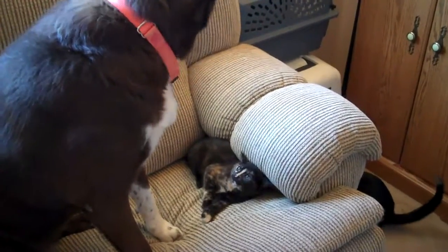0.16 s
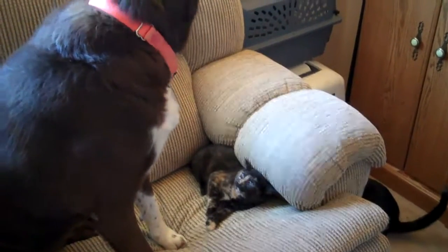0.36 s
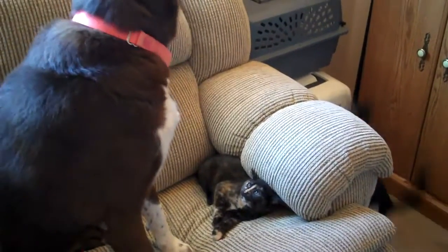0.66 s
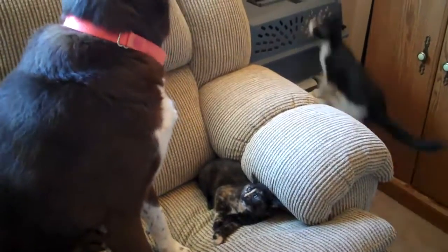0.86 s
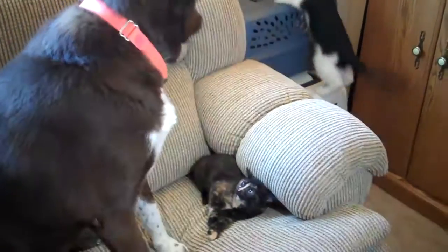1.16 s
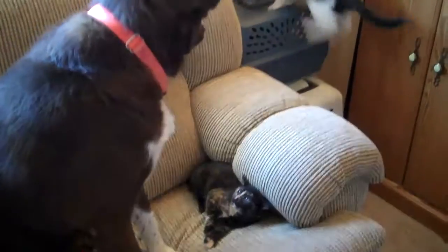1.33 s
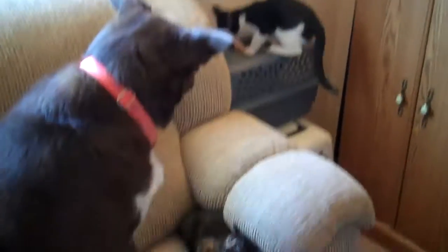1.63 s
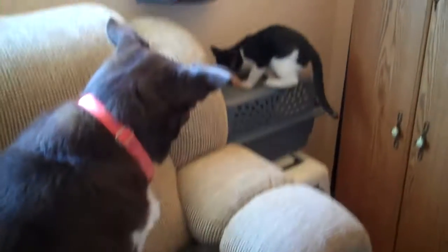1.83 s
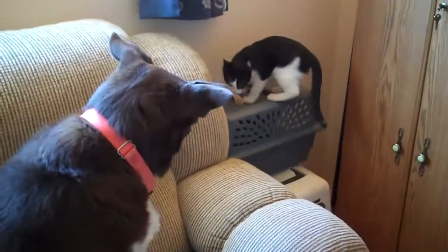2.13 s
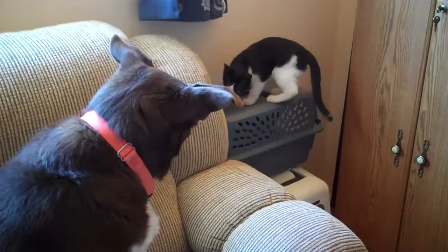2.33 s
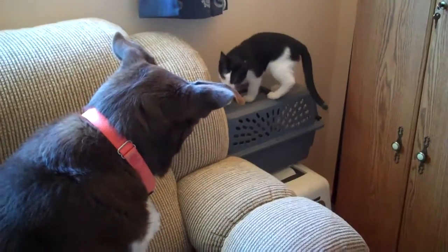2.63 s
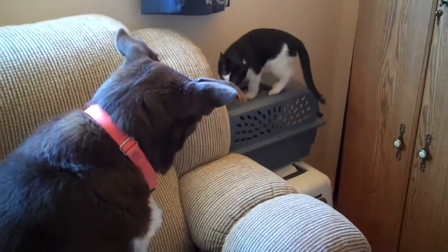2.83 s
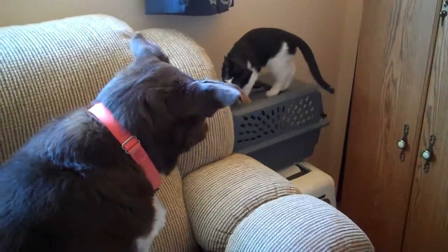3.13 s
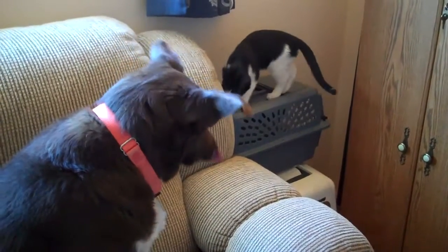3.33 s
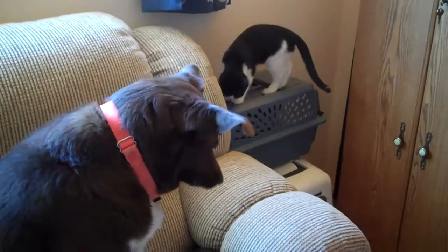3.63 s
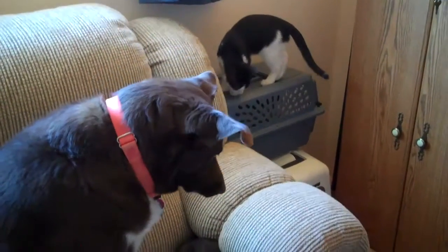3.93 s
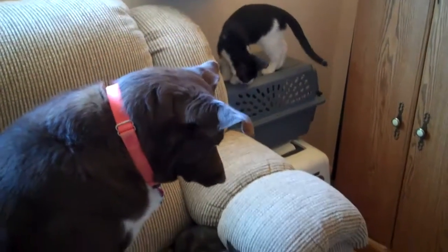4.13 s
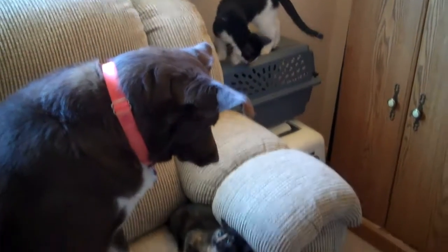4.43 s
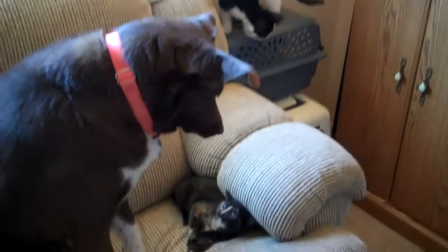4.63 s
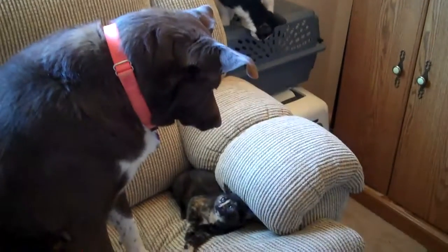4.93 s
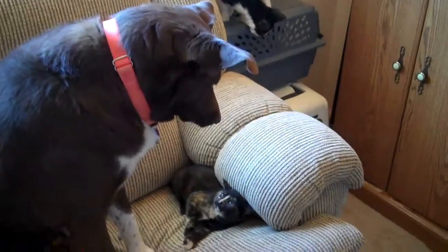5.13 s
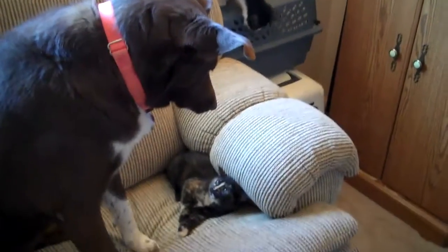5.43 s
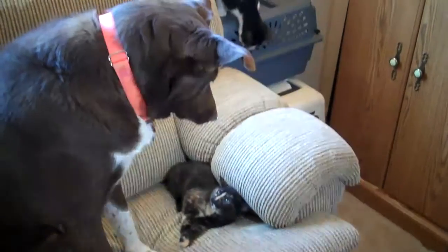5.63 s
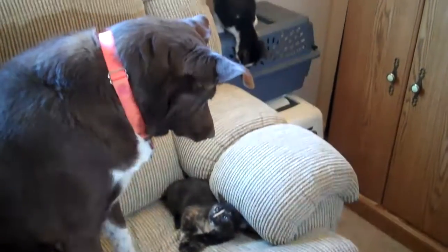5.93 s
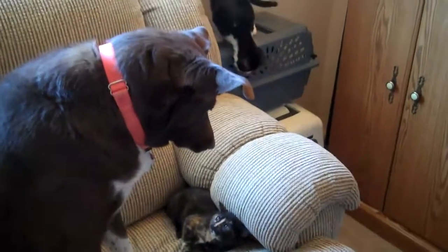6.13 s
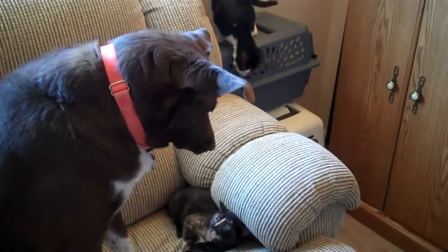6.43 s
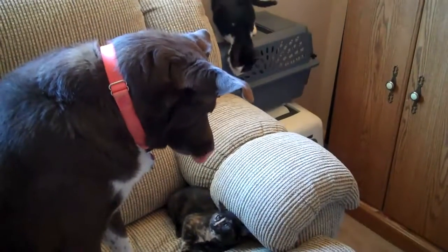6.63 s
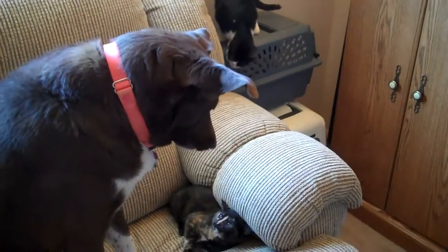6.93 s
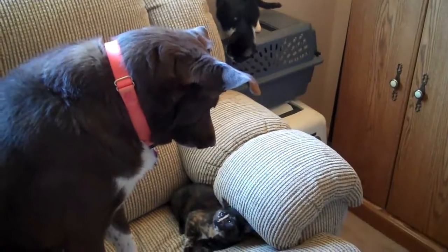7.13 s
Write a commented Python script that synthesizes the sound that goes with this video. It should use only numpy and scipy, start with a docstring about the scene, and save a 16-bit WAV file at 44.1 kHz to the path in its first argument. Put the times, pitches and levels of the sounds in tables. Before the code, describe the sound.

Close stereo pickup of an upset kitten indoors: a popping spit, a short wet hiss, several quiet seconds with faint fur brushing upholstery, then a louder spit and one more hiss. Between the first two outbursts, paws patter softly on a hollow plastic shell. Very low room air and a barely audible motor hum continue beneath, and each burst leaves a short room tail.

```python
"""Soft room air and a low appliance hum run throughout, in a small, quiet living room.
A kitten on an armchair spits and hisses at a dog, then spits and hisses again: bursts of noise ring
the resonances of its tiny mouth and come back from the near walls. Another cat scrambles onto a plastic
carrier (short thuds, knocks and claw ticks), and fur brushes the upholstery as swelling noise."""
import sys
import numpy as np
from scipy import signal
from scipy.fft import rfft, irfft
from scipy.io import wavfile

SR = 44100
rng = np.random.default_rng(int(sys.argv[2]) if len(sys.argv) > 2 else 0)


def file_out(sig):
    """Save sig as 16-bit WAV at sys.argv[1]."""
    # one column per channel
    cols = np.atleast_2d(sig).T
    # limit, then scale
    lim = np.clip(cols, -1, 1)
    pcm = np.round(lim * 32767).astype(np.int16)
    wavfile.write(sys.argv[1], SR, pcm)


N = 320166
TIME = np.arange(N) / SR
FREQS = np.maximum(np.arange(N // 2 + 1) * SR / N, 1)   # kept above zero for the logarithm

# Tone colour of the still room air: pitch_hz, relative_level_db
AIR_COLOUR = [(25, -12), (60, -8), (140, -7), (250, 0), (400, -2), (700, -3), (1300, -5), (2500, -9),
              (5000, -11.5), (9000, -15), (14000, -17)]
# Loudness of the room air over time: time_s, level_db
AIR_LEVEL = [(0, -58), (3.7, -58), (4.1, -59), (7.26, -59)]
# How alike the air is left and right, below 0 when opposed: pitch_hz, likeness (-1 to 1)
AIR_LIKENESS = [(30, -0.266), (100, 0.37), (300, 0.265), (1000, -0.048), (3000, 0.22), (12000, 0.033)]
# Tones of the appliance motor: pitch_hz, level_db
HUM_TONES = [(58.5, -83), (117, -69), (234, -79)]
# Time each band of the room takes to die by 60 dB: pitch_hz, decay_s
ROOM_DECAY = [(200, 0.27), (1200, 0.32), (3500, 0.32), (6500, 0.3), (10000, 0.17), (14000, 0.45)]

# Paw landings, hardness being shell knock over pad thud: peak_s, level_db, hardness_db, fade_s
PAW_LANDINGS = [(0.613, -62, 0, .02), (0.791, -56, 4, .009), (0.817, -56, 1, .012),
                (0.978, -56, -1.5, 0.013), (0.997, -61, -10, .012), (1.271, -51.5, -0.5, .016),
                (1.373, -54, -1, 0.023), (1.43, -57.5, 3, 0.036), (1.528, -46.5, 6.5, 0.0044),
                (1.552, -65.5, -23, .012), (1.962, -56, 5, .018), (2.913, -65, -1, 0.12),
                (6.577, -61, 13, 0.0083), (6.771, -67, 3, .014)]
# Claw ticks: start_s, scratch_db, shell_knock_db
CLAW_TICKS = [(.787, -60, -42), (1.134, -42, -78), (1.694, -51, -42), (2.687, -56, -66), (5.254, -52, -68),
              (6.659, -42, -62), (6.811, -55, -68)]
# Strokes of fur on upholstery: peak_s, swish_db, dull_rub_db, swell_s, fade_s
FUR_STROKES = [(1.24, -57, -60.5, 0.025, 0.012), (3.502, -56.5, -74.5, .3, 0.12),
               (3.62, -64.5, -56, 0.025, 0.032), (6.58, -58.5, -68, 0.36, 0.053),
               (6.7, -59, -62.5, 0.04, 0.036)]
# Resonances of the carrier's shell: pitch_hz, width_hz, relative_level_db
SHELL_RESONANCES = [(565, 390, 2.5), (740, 190, 4), (920, 750, -2.5), (1425, 1000, 0), (2250, 890, -6.5)]
# Hollow boom of the carrier under a paw: pitch_hz, width_hz, relative_level_db
BOOM_RESONANCES = [(179, 78, -2.5), (240, 76, -20.5)]
# Tone colour of a dull pad thud: pitch_hz, relative_level_db
THUD_COLOUR = [(60, -21.5), (110, -11), (180, -6), (280, -11.5), (450, -10.5), (1000, -47)]
# Tone colour of scratching, also used for the rough part of a spit: pitch_hz, relative_level_db
SCRATCH_COLOUR = [(1500, -22.5), (3200, -5.5), (4500, -5), (6400, 0), (7600, -7), (9500, -33), (14000, -55)]

# Spits: peak_s, level_db
SPIT_TIMES = [(.5706, -19.5), (4.913, -13.5)]
# Hisses: start_s, level_db, time_to_last_surge_s
HISS_TIMES = [(1.789, -14.5, .110), (6.229, -15, 0.1107)]
# The same three surges push out every hiss: share_of_time_to_last, level_db, rise_s, fall_s
HISS_SURGES = [(.2, 1, .017, .006), (.49, 1, 0.0076, 0.018), (1, -2.5, .008, .005)]
# Mouth resonances in a spit, lips barely parted: pitch_hz, width_hz, relative_level_db
SPIT_RESONANCES = [(1220, 152, -25.5), (2300, 220, -34), (3550, 470, -22), (3910, 480, -19.5),
                   (5760, 390, -12), (6510, 140, -2), (7090, 600, 5.5), (8100, 280, -8), (8550, 350, -11.5)]
# Mouth resonances in a hiss, jaws wide: pitch_hz, width_hz, relative_level_db
HISS_RESONANCES = [(1065, 200, -29.5), (1420, 427, -28), (2590, 310, -28), (3400, 170, -10.5),
                   (4510, 2330, -9), (5460, 1130, -3.5), (6916, 1110, 7.5), (7570, 510, 1.5),
                   (9440, 900, -24.5)]
# Throat ring as the jaws open: pitch_hz, width_hz, relative_level_db
THROAT_RESONANCES = [(2330, 170, 0)]
# First reflections from chair, wall and cupboard: delay_s, left_db, right_db
FIRST_ECHOES = [(.0024, -13, -12), (.0061, -5, -10), (.0075, -6, -8), (.0108, -14, -14), (.0132, -10, -14)]
# Colour of the left microphone port toward the kitten: pitch_hz, gain_db
LEFT_COLOUR = [(1000, 10), (4000, 2.5), (5800, 4.5), (7200, 0), (9000, 1.5), (9900, -2.5), (10600, -24.5),
               (13000, -5)]
# Colour of the right microphone port toward the kitten: pitch_hz, gain_db
RIGHT_COLOUR = [(1000, 10.5), (4000, 3.5), (5800, 8.5), (7200, -10), (9000, -5), (9900, -12.5),
                (10600, -24), (13000, -21)]

# A pad settles this fast; its scuff is set against its knock
PAW_PRESS_S, PAW_SCUFF_DB = 0.0075, -3.5
CLAW_DELAY_S, CLAW_RISE_S, CLAW_FALL_S = 0.0009, 0.000585, 0.0025
# Pad thud and carrier boom, both set against the landing's thud share
THUD_DB, BOOM_DB = -0.5, -3.5
# The pop of a spit, and the softer air that slips out around it
SPIT_RISE_S, SPIT_FALL_S = 0.0037, 0.0019
LEAK_DB, LEAK_LEAD_S, LEAK_RISE_S, LEAK_FALL_S = -12.5, 0.0023, 0.0019, 0.0076
# The jaws open this fast, and the throat rings just after the start
JAW_SNAP_S = 0.0015
THROAT_DB, THROAT_AT_S, THROAT_RISE_S, THROAT_FALL_S = -22, 0.0062, 0.002, 0.0042
PORT_LAG_S = 8e-5   # the kitten's direct sound reaches the right port this much later
PEAK_LIMIT, CUTOFF_HZ = 0.88, 14150


def from_db(db):
    """Turn decibels into a plain multiplier."""
    return 10 ** (np.asarray(db) / 20)


def rms_one(x):
    """Scale a sound to an average power of one."""
    return x / np.sqrt(np.mean(x ** 2) + 1e-20)


def at_hz(points, hz):
    """Read a table between its points, with pitch spaced by ratio as the ear hears it."""
    table_hz, value = np.transpose(points)
    return np.interp(np.log(hz), np.log(table_hz), value)


def burst(peak_s, rise, fall):
    """Loudness curve that swells to 1 at its peak and dies away exponentially."""
    swelling = (TIME - peak_s) / rise
    fading = (peak_s - TIME) / fall
    return np.exp(np.maximum(np.minimum(swelling, fading), -60))


def colour(x, spectrum):
    """Make each pitch of a sound louder or softer, as the table says."""
    return irfft(rfft(x) * from_db(at_hz(spectrum, FREQS)), N)


def noise(spectrum):
    """Random hiss given a tone colour, at unit power."""
    return rms_one(colour(rng.standard_normal(N), spectrum))


def resonant_noise(resonances):
    """Rushing air or rough contact ringing several resonances with steep sides, at unit power."""
    total = 0
    for hz, width, db in resonances:
        r = np.exp(-np.pi * width * np.sqrt(2) / SR)
        feedback = [1, -2 * r * np.cos(2 * np.pi * hz / SR), r * r]
        section = [(1 - r * r) / 2, 0, (r * r - 1) / 2] + feedback
        # The same filter twice makes the sides steep
        ringing = signal.sosfilt([section, section], rng.standard_normal(N))
        total = total + from_db(db) * ringing
    return rms_one(total)


def flutter(rate_hz, depth_db):
    """A random wobble in loudness, mostly slower than the given rate, at unit power."""
    wobble = irfft(rfft(rng.standard_normal(N)) / (1 + (FREQS / rate_hz) ** 4), N)
    return rms_one(from_db(depth_db * rms_one(wobble)))


def delay(x, seconds):
    """Make the same sound arrive later by turning the phase of each pitch."""
    return irfft(rfft(x) * np.exp(-2j * np.pi * FREQS * seconds), N)


def room(x, wet_db, build_s=0.0033):
    """Blurred stereo echoes that build up quickly and die at their own pace in each band."""
    t = TIME[:SR // 2]
    edges = np.geomspace(80, 16000, 13)
    tail = 0
    for low, high in zip(edges, edges[1:]):
        band_filter = signal.butter(2, [low, high], "band", fs=SR, output="sos")
        band = signal.sosfilt(band_filter, rng.standard_normal((2, len(t))))
        decay_s = at_hz(ROOM_DECAY, np.sqrt(low * high))
        tail = tail + band * np.exp(-np.log(1000) * t / decay_s)
    tail = rms_one(tail * (1 - np.exp(-t / build_s))) / np.sqrt(len(t))
    return from_db(wet_db) * signal.fftconvolve(x[None], tail, axes=1)[:, :N]


def room_air():
    """Soft air noise: shared and opposed parts set how alike the sides are; some bands lean left."""
    alike = np.clip(at_hz(AIR_LIKENESS, FREQS), -1, 1)
    lean_db = at_hz([(120, .3), (350, 1), (700, 2.74), (1400, .3)], FREQS)
    lean = from_db(lean_db * [[1], [-1]])   # left up, right down
    shared = np.sqrt(1 + alike) * rfft(noise(AIR_COLOUR))
    opposed = np.sqrt(1 - alike) * rfft(noise(AIR_COLOUR)) * [[1], [-1]]
    air = irfft(lean * (shared + opposed), N)
    level = from_db(np.interp(TIME, *np.transpose(AIR_LEVEL)))
    return level * rms_one(air)


def motor_hum():
    """The appliance motor sounds a few fixed low tones whose loudness wavers together."""
    hum = 0
    for hz, db in HUM_TONES:
        tone = np.sin(2 * np.pi * (hz * TIME + rng.random()))
        hum = hum + from_db(db) * np.sqrt(2) * tone
    return hum * flutter(rate_hz=3, depth_db=1.3)


def footwork():
    """Pads thud on the hollow carrier and knock its shell, claws tick, fur rubs on cloth."""
    thud = knock = 0
    for s, db, hardness_db, fade in PAW_LANDINGS:
        press = from_db(db) * burst(s, PAW_PRESS_S, fade)
        thud = thud + from_db(-hardness_db / 2) * press
        knock = knock + from_db(hardness_db / 2) * press
    scuff = from_db(PAW_SCUFF_DB) * knock
    for s, scratch_db, knock_db in CLAW_TICKS:
        tick = burst(s + CLAW_DELAY_S, CLAW_RISE_S, CLAW_FALL_S)
        scuff = scuff + from_db(scratch_db) * tick
        knock = knock + from_db(knock_db) * tick
    # The dull part of a rub shares the shell's tone colour
    for s, swish_db, rub_db, swell, fade in FUR_STROKES:
        stroke = burst(s, swell, fade)
        scuff = scuff + from_db(swish_db) * stroke
        knock = knock + from_db(rub_db) * stroke
    grain = flutter(rate_hz=63, depth_db=2.0)
    body = from_db(THUD_DB) * noise(THUD_COLOUR) + from_db(BOOM_DB) * resonant_noise(BOOM_RESONANCES)
    contact = knock * resonant_noise(SHELL_RESONANCES) + scuff * noise(SCRATCH_COLOUR)
    near = thud * body + grain * contact
    return near * from_db([[.5], [-.5]]) + room(near, wet_db=-1.5)   # slightly left


def spits():
    """Pressure builds behind the tongue and escapes in one pop, with a softer leak around it."""
    flow = 0
    for s, db in SPIT_TIMES:
        pop = burst(s, SPIT_RISE_S, SPIT_FALL_S)
        leak = from_db(LEAK_DB) * burst(s - LEAK_LEAD_S, LEAK_RISE_S, LEAK_FALL_S)
        flow = flow + from_db(db) * (pop + leak)
    return flow * (resonant_noise(SPIT_RESONANCES) + from_db(-26.0) * noise(SCRATCH_COLOUR))


def hisses():
    """Jaws snap open, the throat rings briefly, and a jet sputters over the wet tongue in surges."""
    flow = opening = 0
    for start, db, length in HISS_TIMES:
        jaws = np.clip((TIME - start) / JAW_SNAP_S, 0, 1)
        push = 0
        for share, surge_db, rise, fall in HISS_SURGES:
            push = push + from_db(surge_db) * burst(start + share * length, rise, fall)
        flow = flow + from_db(db) * jaws * push
        throat_ring = burst(start + THROAT_AT_S, THROAT_RISE_S, THROAT_FALL_S)
        opening = opening + from_db(db + THROAT_DB) * jaws * throat_ring
    sputter = flutter(rate_hz=600, depth_db=2)
    jet = sputter * resonant_noise(HISS_RESONANCES)
    return from_db(-1.5) * flow * jet + opening * resonant_noise(THROAT_RESONANCES)


def kitten():
    """The kitten's sound reaches the left port first, then returns from near surfaces and the room."""
    low_cut = signal.butter(6, 900, "high", fs=SR, output="sos")
    mouth = signal.sosfilt(low_cut, spits() + hisses())
    near = np.array([mouth, delay(mouth, PORT_LAG_S)])
    for s, left_db, right_db in FIRST_ECHOES:
        # Each reflection comes from its own direction
        lag = rng.uniform(-2, 1.8) * PORT_LAG_S
        left_echo = from_db(left_db) * delay(mouth, s)
        right_echo = from_db(right_db) * delay(mouth, s + lag)
        near = near + [left_echo, right_echo]
    left, right = from_db(1.95) * near + room(mouth, wet_db=-1.5)
    return np.array([colour(left, LEFT_COLOUR), colour(right, RIGHT_COLOUR)])


def scene():
    """Room air, hum, paws and kitten sound together."""
    return room_air() + motor_hum() + footwork() + kitten()


def record(dry):
    """Peaks beyond the limit are flattened by overload, and the top of the treble is cut steeply."""
    treble_cut = signal.ellip(10, .1, 80, CUTOFF_HZ, fs=SR, output="sos")
    return signal.sosfilt(treble_cut, np.clip(dry, -PEAK_LIMIT, PEAK_LIMIT))


dry = scene()
out = record(dry)
file_out(out)
```